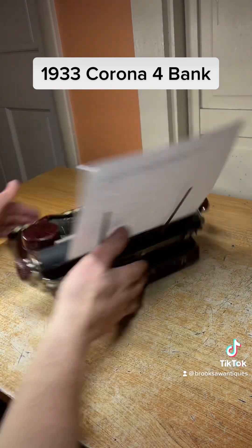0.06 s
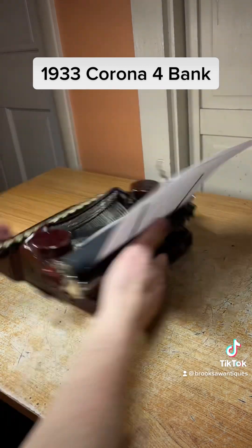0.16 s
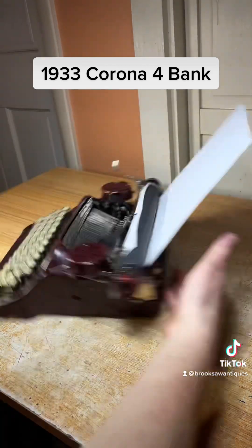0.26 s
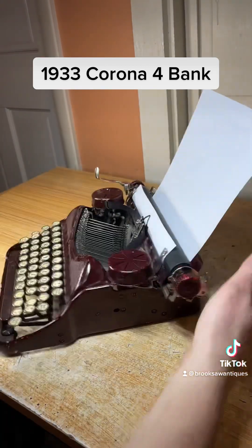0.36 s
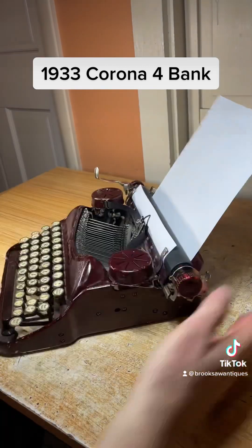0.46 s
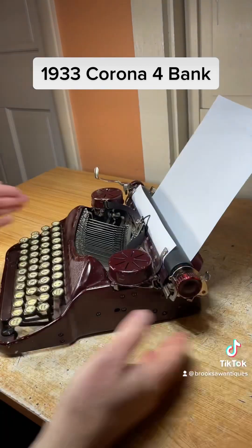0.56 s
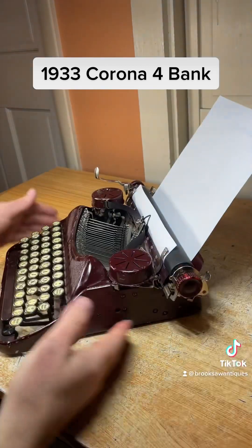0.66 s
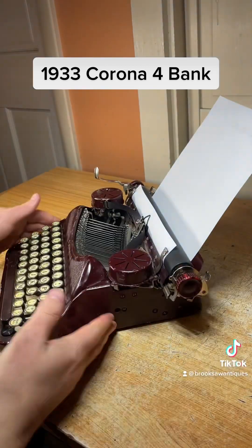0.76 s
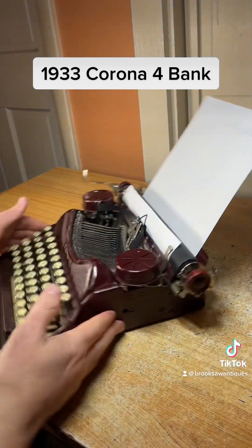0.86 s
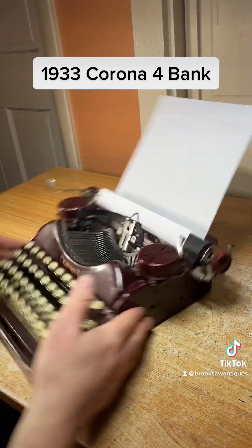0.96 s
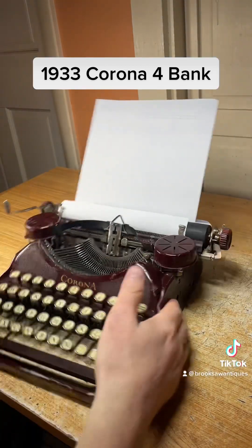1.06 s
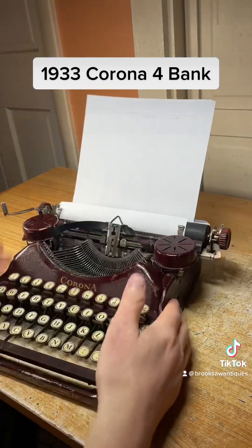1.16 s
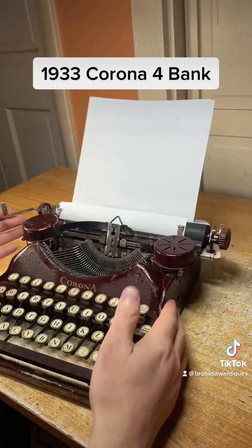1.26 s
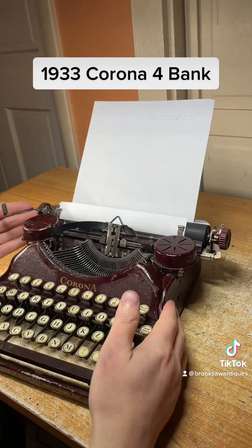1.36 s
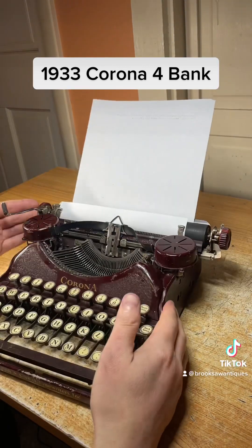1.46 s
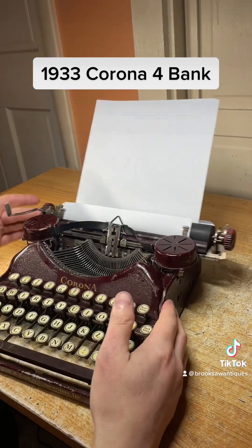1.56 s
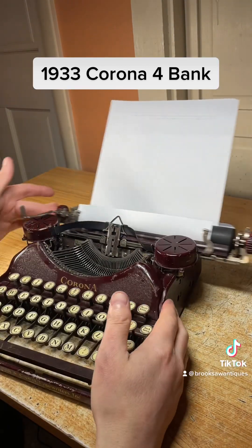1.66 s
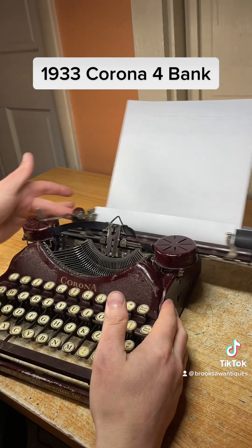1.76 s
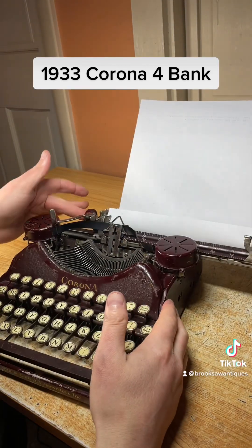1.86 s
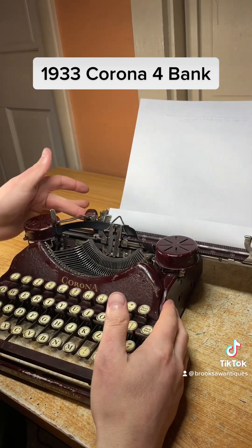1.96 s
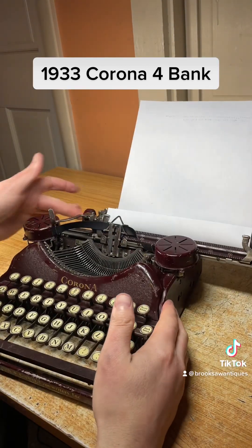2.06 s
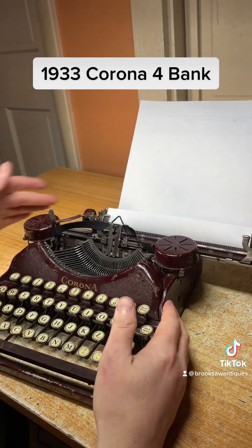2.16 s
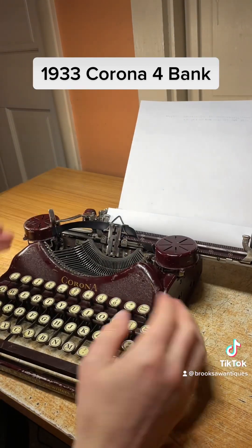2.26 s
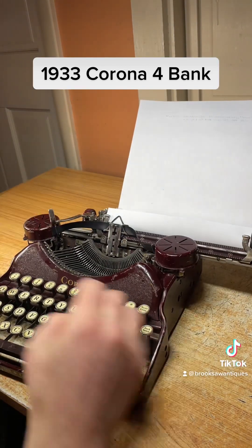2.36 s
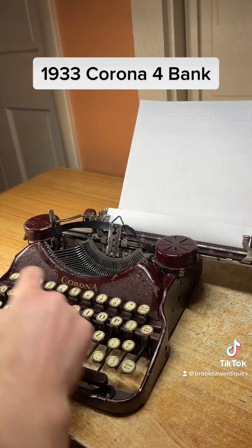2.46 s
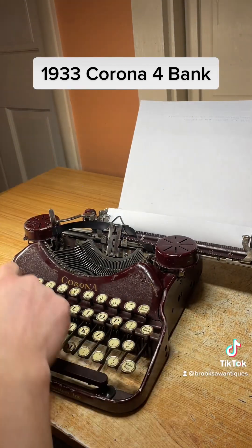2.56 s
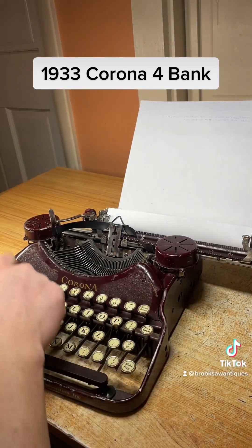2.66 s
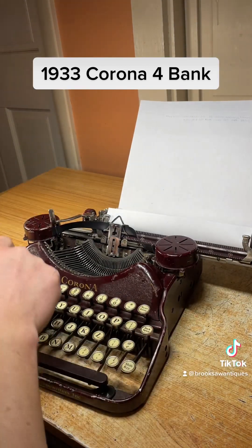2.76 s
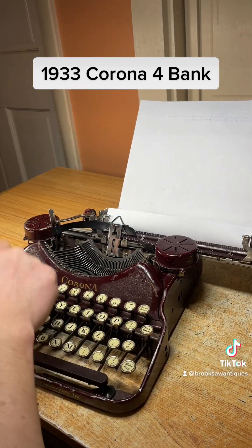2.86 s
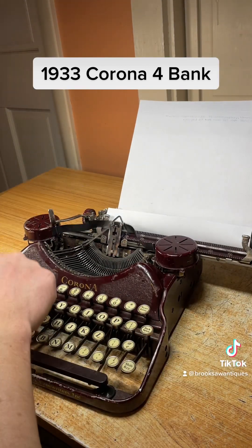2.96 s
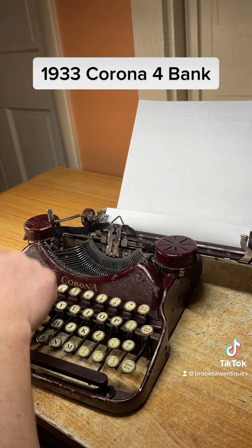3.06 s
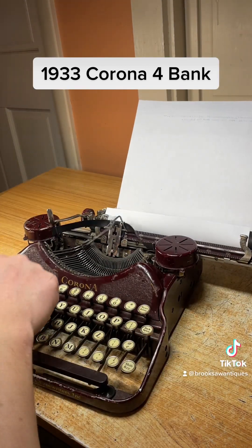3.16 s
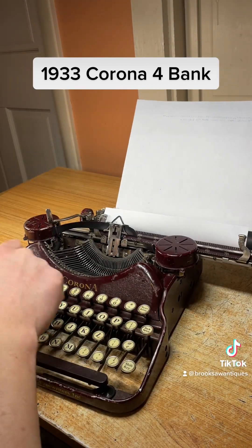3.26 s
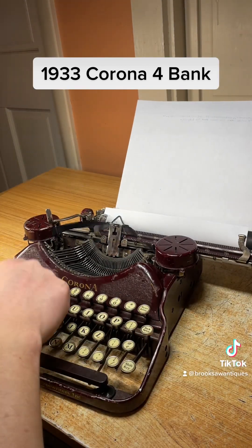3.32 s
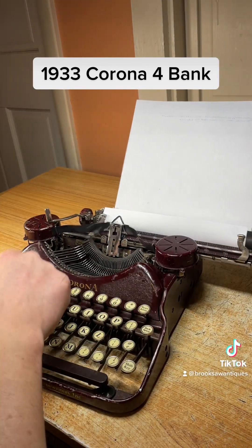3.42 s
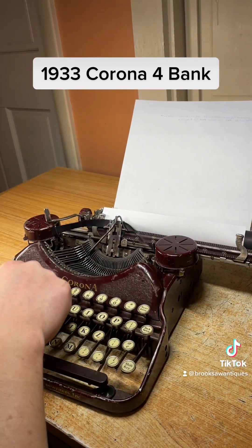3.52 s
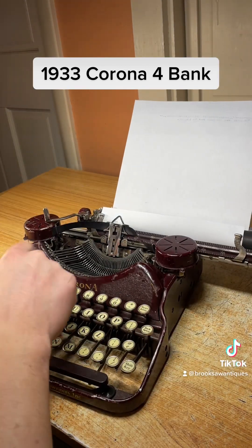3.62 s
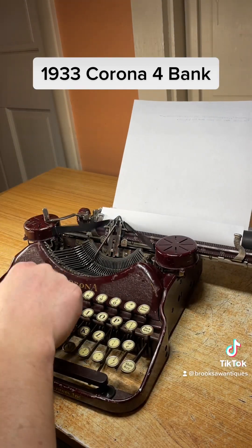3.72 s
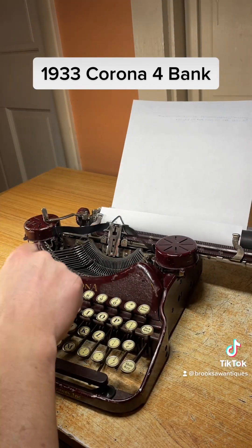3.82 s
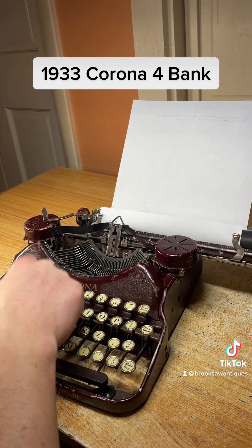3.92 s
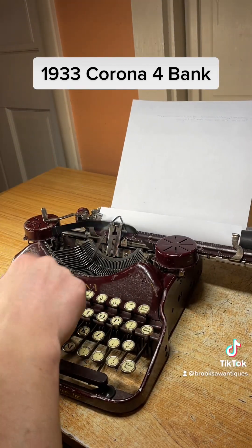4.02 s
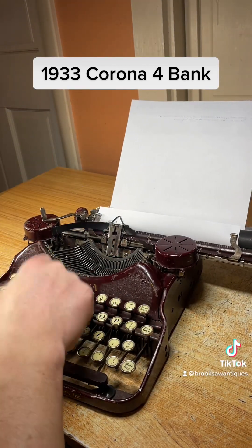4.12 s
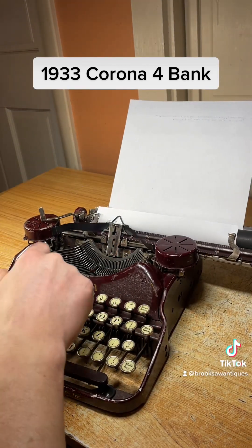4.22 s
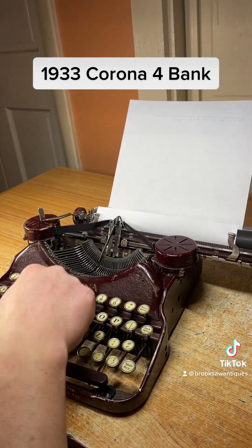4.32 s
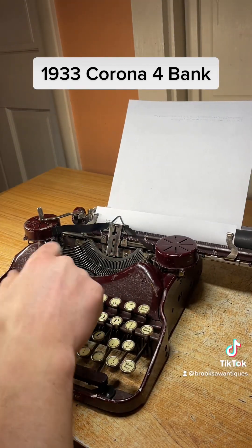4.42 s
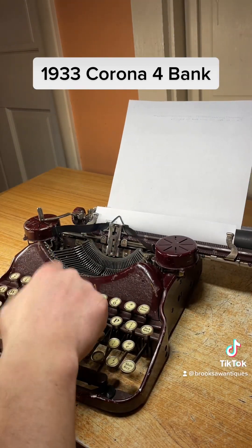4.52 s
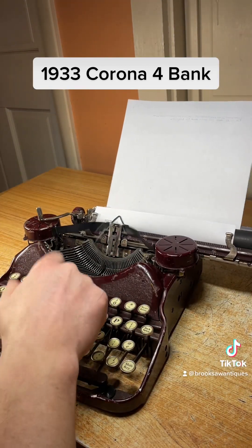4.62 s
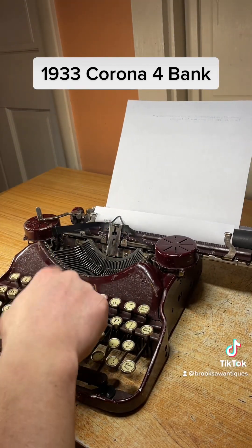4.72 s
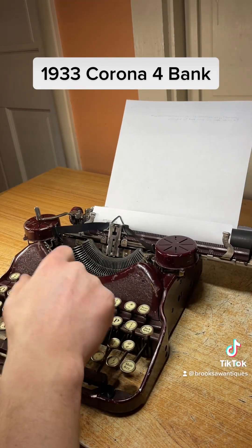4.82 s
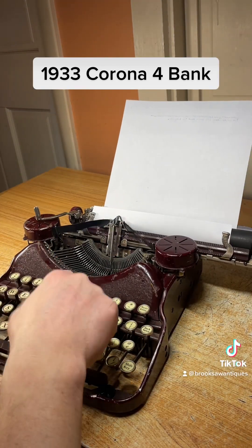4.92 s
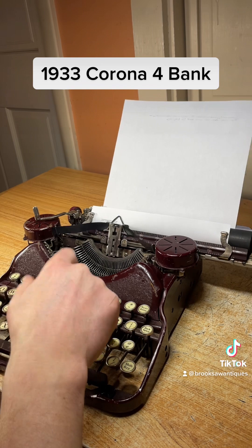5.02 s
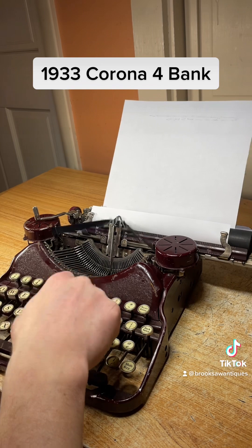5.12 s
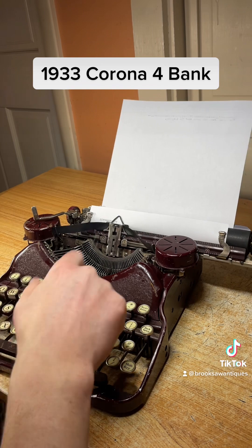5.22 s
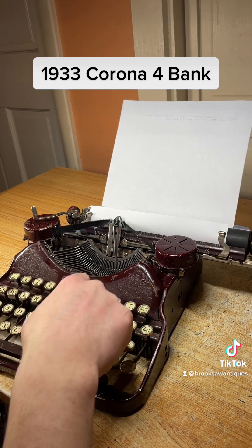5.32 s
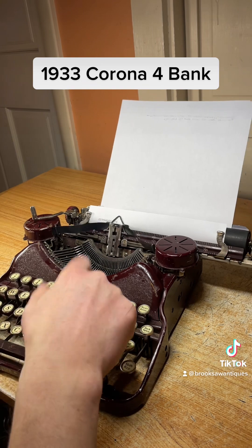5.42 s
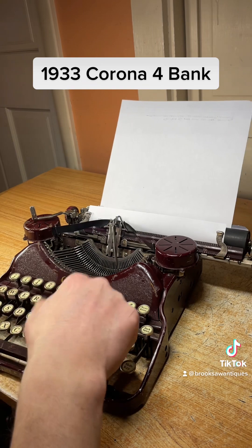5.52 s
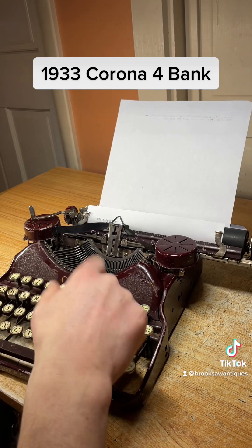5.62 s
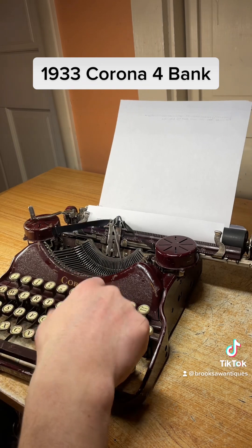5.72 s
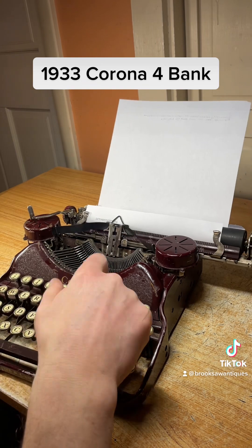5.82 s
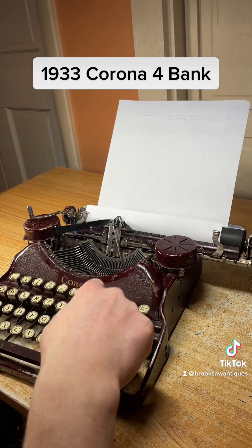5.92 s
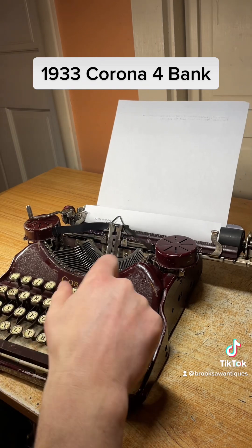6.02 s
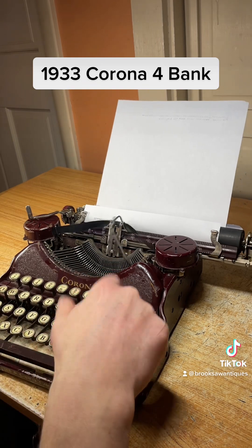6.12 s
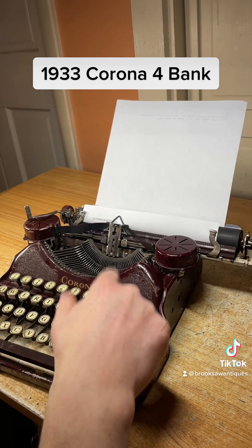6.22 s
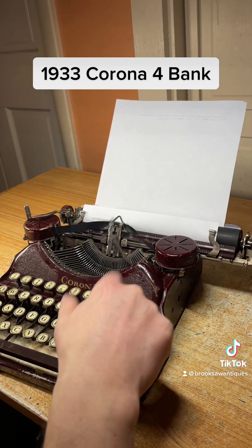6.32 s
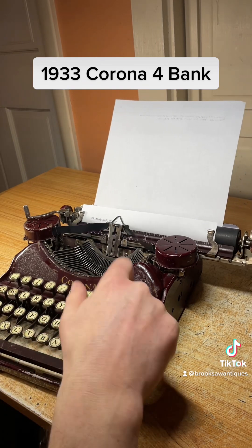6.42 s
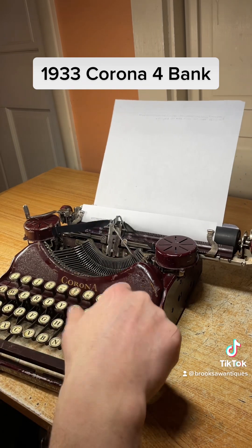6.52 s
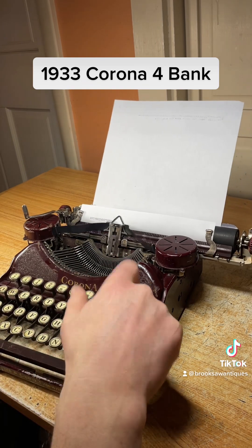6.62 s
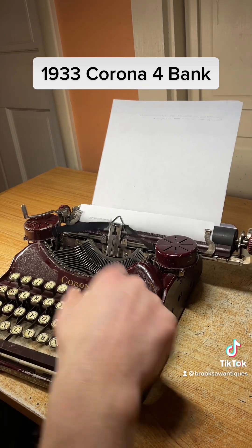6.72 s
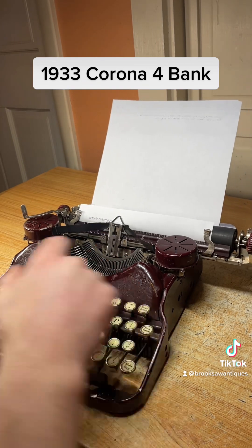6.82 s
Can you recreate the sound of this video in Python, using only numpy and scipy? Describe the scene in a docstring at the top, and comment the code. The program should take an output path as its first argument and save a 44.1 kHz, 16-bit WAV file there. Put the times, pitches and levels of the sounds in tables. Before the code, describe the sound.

Faint scrapes and knocks, a quick ratchet zip ending in a metallic clunk, then about twenty sharp, steady typebar strikes in a small room.

```python
"""One finger types an even run of keys on a portable typewriter that stands on a wooden table.
Before this the machine is turned on the table and its carriage is pushed over the rack to its stop.
Impacts are short noise bursts, coloured by what is struck; they set decaying modes of the steel frame going.
Pushes ring the low modes of the table top. A small room adds echoes and a decaying tail to the machine,
over steady low noise, and two close microphone ports hear it partly alike."""
import sys
import numpy as np
from scipy import signal
from scipy.fft import rfft, irfft
from scipy.io import wavfile

SR = 44100
rng = np.random.default_rng(int(sys.argv[2]) if len(sys.argv) > 2 else 0)


def output_pcm(signal):
    """Save a mono or channel-first signal as 16-bit PCM at the path in sys.argv[1].

    Samples are clipped to [-1, 1] before scaling.
    """
    pcm = np.clip(np.atleast_2d(signal).T, -1, 1) * 32767
    wavfile.write(sys.argv[1], SR, np.round(pcm).astype(np.int16))


N = 303408

# Keystrokes: (slug hits the platen [s], blow level [dB], rebound level [dB], key bottoms this long before [ms],
# key clatter level [dB], thump into the table [dB])
KEYSTROKES = [(2.8966, -8, -6, 8.5, -25, -30), (3.116, -11, -0.8, 10.7, -27.5, -28.5),
              (3.3188, -15, -1, 10, -26.5, -27), (3.524, -9.5, -3, 8.6, -26, -24),
              (3.7313, -8, -4, 9.8, -26.5, -25), (3.9348, -8, 0.5, 10, -29.5, -27),
              (4.1371, -3, -4.5, 11.3, -30, -23.5), (4.3307, -10, 1.5, 10.2, -36, -29),
              (4.5286, -6, -4.5, 10.4, -29.5, -30), (4.7221, -4, -3.5, 8.3, -27, -30),
              (4.9156, -5, -8.5, 9.2, -28, -26.5), (5.1104, -4, -9.5, 9.7, -31, -27.5),
              (5.3084, -3.5, -5, 9.6, -27.5, -28), (5.4977, -4.5, -9.5, 9.6, -28, -30),
              (5.695, -3.5, -5.5, 10.3, -27.5, -25), (5.894, -4, -5.5, 10, -26.5, -25.5),
              (6.0887, -8, 1, 8.1, -26, -23), (6.2857, -2.5, -4, 8.8, -25, -25),
              (6.4758, -9, -4, 9, -21, -27.5), (6.668, -7.5, -0.5, 8.8, -21, -21.5)]
# Keys let go: (typebar lands on its rest [s], thump into the table [dB])
KEY_RELEASES = [(3.013, -20), (3.2197, -20.5), (3.4234, -22), (3.6259, -24), (3.839, -23.5), (4.041, -24),
                (4.235, -22), (4.419, -24), (4.6269, -22), (4.819, -21.5), (5.016, -23.5), (5.2062, -23),
                (5.412, -21.5), (5.608, -23), (5.797, -23.5), (5.994, -20), (6.179, -28.5), (6.3706, -22),
                (6.5668, -19.5), (6.7593, -22)]
# Modes of the wooden table top: (frequency [Hz], relative level [dB], t60 before damping [s])
TABLE_MODES = [(52, -16, 0.34), (90.6, -8.5, 0.22), (117.2, 1, 0.17), (145.4, 0.5, 0.39),
               (190.7, -3.5, 0.094), (260, -15, 0.17), (313, -50, 0.06), (416, -15, 0.073),
               (613, -14.5, 0.13)]
# Spectrum of keys and loose parts: (frequency [Hz], relative level [dB])
KEY_COLOUR = [(200, 2.5), (600, 2.5), (2300, 4), (4500, 3.5), (8000, 2.5), (11500, -14), (15000, -5)]
# Spectrum of the steel body and the carriage rail: (frequency [Hz], relative level [dB])
BODY_COLOUR = [(300, -2.5), (1000, 4.5), (1600, 8), (2500, 9.5), (5000, 3), (8000, 2.5), (11500, -18),
               (15000, -1)]

UNEVEN_DB = 1.5  # standard deviation of the small clicks from one to the next


def amp(db):
    """Level in decibels to amplitude ratio: 20 dB is a factor of ten."""
    return 10 ** (np.asarray(db, float) / 20)


def read(points, hz):
    """Piecewise-linear interpolation of a spectrum on a log-frequency axis."""
    f, value = np.transpose(points)
    return np.interp(np.log(hz + 1), np.log(f + 1), value)


def add(mix, s, sound):
    """Linear superposition: mixes a sound in at time s, in place."""
    part = mix[max(round(s * SR), 0):][:len(sound)]
    part += sound[:len(part)]


def level(rows):
    """Envelope linear in decibels between rows (time [s], level [dB]), 120 dB down outside them."""
    s, db = np.transpose(rows)
    return amp(np.interp(np.arange(N) / SR, s, db, left=-120, right=-120))


def noise():
    """White noise of unit power: equal power at every frequency."""
    return rng.standard_normal(N)


def held_db(spread_db, hold):
    """Random modulation in dB: a normal draw held for a number of samples."""
    draws = rng.standard_normal(N // hold + 1)
    return spread_db * np.repeat(draws, hold)[:N]


def colour(x, points, size=2048):
    """Minimum-phase (causal) filter of a given spectrum, scaled to keep the power of white noise."""
    hz = abs(np.fft.fftfreq(size, 1 / SR))
    log_gain = np.log(amp(read(points, hz)))
    # the Hilbert transform of the log gain gives the minimum phase
    response = np.exp(np.conj(signal.hilbert(log_gain)))
    taps = np.fft.ifft(response).real[:size // 2]
    return signal.oaconvolve(x, taps / np.linalg.norm(taps))[:N]


def ring(x, modes, damping=1):
    """Modal synthesis: the excitation x sets exponentially decaying sines going; damping scales t60."""
    t = np.arange(SR // 2) / SR
    response = sum(amp(db - 60 * t / (t60 * damping)) * np.sin(2 * np.pi * hz * t)
                   for hz, db, t60 in modes)
    return signal.oaconvolve(x, response)


def bursts(s, db, rise_ms, t60_ms):
    """Impact noise: linear rise up to each time s, exponential decay after; the envelope fixes the energy."""
    out = np.zeros(N)
    rows = np.broadcast(s, amp(db), np.maximum(rise_ms, .05), np.maximum(t60_ms, .5))
    for at, gain, rise, t60 in rows:
        ms = np.arange(-rise, t60, 1000 / SR)
        shape = np.where(ms < 0, 1 + ms / rise, amp(-60 * ms / t60))
        noisy = shape * rng.standard_normal(len(ms))
        same_energy = np.linalg.norm(shape) / np.linalg.norm(noisy)
        add(out, at - rise / 1000, gain * noisy * same_energy)
    return out


def hush():
    """Stationary filtered noise: the steady low noise of the room."""
    # Spectrum of the room noise: (frequency [Hz], relative level [dB])
    hush_colour = [(30, 5.5), (50, -6), (140, -5), (220, -3), (600, -4.5), (1000, -9), (1300, -11.5),
                   (1600, -13.5), (2000, -17), (4200, -30), (6500, -36.5), (11000, -39), (12500, -66)]
    return amp(-60) * colour(noise(), hush_colour, size=8192)


def room(x):
    """Reverberation as convolution: direct sound, single echoes, and sparse taps with t60 set by frequency."""
    # Single echoes: (delay [ms], level against the direct sound [dB])
    echoes = [(2.5, -63.5), (7.0, -17), (9.5, -24.5), (12.5, -29.5), (23.0, -23.5), (28.0, -25)]
    # Reverberation time: (frequency [Hz], t60 [s])
    room_t60 = [(200, 1), (1000, 0.28), (4500, 0.33), (8000, 0.21), (13000, 0.14)]
    taps = np.zeros(SR // 2)
    at = np.arange(200, len(taps) - 20, 20)
    taps[at + rng.integers(0, 20, len(at))] = rng.choice([-1., 1.], len(at))
    hz, t, bands = signal.stft(taps, SR, nperseg=128)
    decay = amp(-60 * t / read(room_t60, hz)[:, None])
    response = signal.istft(bands * decay, SR, nperseg=128)[1]
    response *= amp(-15.5) / np.linalg.norm(response)
    response[0] = 1  # direct sound
    for ms, db in echoes:
        response[round(ms * SR / 1000)] += amp(db)
    return signal.oaconvolve(x, response)[:N]


def ports(a, b, likeness):
    """Coherence of two receivers: left hears a; right hears a shifted in phase, blended with unrelated b."""
    # Phase by which the left port leads: (frequency [Hz], lead [rad])
    phase_lead = [(300, 0), (690, -.4), (2000, .1), (3200, .8), (4900, .4), (6370, 1.4), (7700, 2.25),
                  (9400, 2.95), (14500, 3.2), (15400, 3.5)]
    hz = np.fft.rfftfreq(N, 1 / SR)
    same = np.clip(read(likeness, hz), 0, 1)
    turn = np.exp(.5j * read(phase_lead, hz))  # half the lead on each port
    a, b = rfft(a), rfft(b)
    right = same * a + np.sqrt(1 - same ** 2) * b  # keeps the power
    return irfft(np.array([a * turn, right / turn]), N)


def teeth():
    """Ratchet kinematics: when each rack tooth passes the pawl, and the dB lost while the carriage is slow."""
    # Carriage travel along the rack: (time [s], teeth passed [count])
    travel = [(1.4713, 0), (1.5355, 2), (1.5685, 4), (1.6072, 7), (1.653, 11), (1.6928, 15), (1.7955, 28),
              (1.8444, 34)]
    full_speed, db_per_doubling = 67, 10  # teeth/s; slower than this the pawl drops more softly
    s, passed = np.transpose(travel)
    at = np.interp(np.arange(passed[-1] + 1), passed, s)
    speed = 1 / np.gradient(at)
    return at, db_per_doubling * np.log2(np.minimum(speed / full_speed, 1))


def pushes():
    """Impulses into the table, each as (time [s], level [dB], rise [ms], t60 factor, extra low level [dB])."""
    # Pushes in handling: (time [s], level [dB], factor on t60 [ratio], extra level of the lowest modes [dB])
    thuds = [(0.244, -52, 0.59, 14), (0.315, -40, .42, -4), (0.424, -58, .65, -3), (1.13, -44, 0.92, -3),
             (1.869, -14, 0.72, -11), (2.023, -28.5, 0.54, 7.5), (2.236, -50, 0.97, -5),
             (2.4, -46.5, 0.54, 5.5), (2.486, -48.5, 0.33, 12), (2.871, -44, 0.57, 13)]
    # Push of a blow: (delay after the slug hits [ms], rise time constant [ms], factor on t60 [ratio],
    # extra level of the lowest modes [dB])
    blow_push = (2.5, 1.5, 0.88, -5)
    # Push of a returning typebar: (delay after it lands [ms], rise time constant [ms],
    # extra level of the lowest modes [dB])
    return_push = (12.44, 5.1, 1.9)
    # The ring shortens as the hand moves along the row:
    # (factor on t60 at the first key [ratio], at the last key [ratio])
    return_damping = (0.7, 0.24)
    rows = [(s, db, 2.9, damping, low_db) for s, db, damping, low_db in thuds]
    rows += [(s + blow_push[0] / 1000, db, *blow_push[1:]) for s, *_, db in KEYSTROKES]
    delay_ms, rise_ms, low_db = return_push
    dampings = np.linspace(*return_damping, len(KEY_RELEASES))
    rows += [(s + delay_ms / 1000, db, rise_ms, damping, low_db)
             for (s, db), damping in zip(KEY_RELEASES, dampings)]
    return rows


def table_shaking():
    """Random vibration: low noise while things move on the table, and modes driven by feet and rack."""
    # Shudder of the table top: (time [s], level [dB])
    shudder = [(0.0, -55), (0.84, -58), (1.21, -52.5), (1.44, -46.5), (1.65, -81), (1.84, -40.5),
               (2.05, -39.5), (2.22, -58.5), (2.9, -60.5), (3.05, -47.5), (5, -44), (6.78, -42.5),
               (6.88, -48)]
    # Spectrum of the shudder: (frequency [Hz], relative level [dB])
    shake_colour = [(30, -6.5), (55, 1), (100, 3), (150, 1.5), (220, -7.5), (400, -19), (1000, -60)]
    # Noise drive from the juddering feet: (time [s], level [dB])
    foot_judder = [(0.69, -71.5), (0.786, -68.5), (0.82, -100)]
    shaking = colour(level(shudder) * noise(), shake_colour, size=8192)
    at, speed_db = teeth()
    rack_rumble = level(np.transpose([at, -67 + speed_db]))
    drive = (level(foot_judder) + rack_rumble) * noise()
    return shaking + ring(drive, TABLE_MODES, damping=.3)[:N]


def table_thumps():
    """Modal response of a plate: each soft push acts at its own spot and so reweights the low modes."""
    out = np.zeros(N)
    rows = pushes()
    spots = rng.standard_normal((len(rows), len(TABLE_MODES), 2))
    for (at, db, rise_ms, damping, low_db), spot in zip(rows, spots):
        modes = []
        for (hz, mode_db, t60), (detune, weight) in zip(TABLE_MODES, spot):
            spread = 3 * weight * (mode_db < -4)  # only the weaker modes vary in level
            modes.append((hz * (1 + .015 * detune), mode_db + spread + low_db * (hz < 130), t60))
        sound = ring([amp(db)], modes, max(damping, .05))
        ms = np.arange(len(sound)) / SR * 1000
        onset = (1 - np.exp(-ms / max(rise_ms, .5))) ** 2
        add(out, at, sound * onset)
    return out


def drag():
    """Friction noise: the feet scrape grittily on the wood; each drag swells, holds and fades."""
    # Drags: (start [s], full [s], letting go [s], end [s], level before grit at start [dB], at full [dB])
    drags = [(0.001, .11, 0.25, 0.48, -57.5, -48), (0.686, 0.955, 0.99, 1.38, -67.5, -52)]
    # Spectrum of the scrape: (frequency [Hz], relative level [dB])
    scrape_colour = [(200, -3), (600, -2.5), (1600, -1.5), (3200, -8), (6500, -12.5), (10000, -15),
                     (15000, -33)]
    fade_db = -23.5  # below full, at the end of a drag
    grit = amp(held_db(1.5, 64) + held_db(1.4, 512))
    weight = sum(level([(start, start_db), (full, db), (letting_go, db), (end, db + fade_db)])
                 for start, full, letting_go, end, start_db, db in drags)
    return colour(weight * grit * noise(), scrape_colour)


def knocks():
    """Impact excitation: handling knocks, each divided between the steel body and the wood."""
    # Knocks of body and carriage: (time [s], level before the division [dB], t60 [ms], share of wood [0-1])
    knock_rows = [(0.072, -35, 48, 0.54), (0.131, -40.5, 76, 0.9), (0.436, -56, 30, 0.9),
                  (0.464, -49.5, 21, 0.77), (0.585, -53.5, 94, 0.7), (0.728, -47.5, 30, 0.34),
                  (0.763, -39, 16, 0.72), (1.027, -39.5, 33, 0.37), (1.125, -44.5, 34, 1),
                  (1.375, -42, 65, 1), (1.444, -48, 55, 0.93), (1.461, -44, 35, 0.6),
                  (1.852, -18.5, 32, 0.08), (1.869, -22.5, 14, 0.6), (2.005, -30, 51, 0.24),
                  (2.452, -59, 47, 0.56), (2.7, -64, 42, 0.36)]
    # Spectrum of the wood: (frequency [Hz], relative level [dB])
    wood_colour = [(150, -8), (350, 0), (800, -3), (1500, -12), (3000, -24), (6000, -34), (15000, -45)]
    rise_ms = .85
    s, db, t60_ms, wood = np.transpose(knock_rows)
    wood_db, steel_db = (20 * np.log10(np.clip(share, 1 / 1000, 1)) for share in (wood, 1 - wood))
    steel_part = colour(bursts(s, db + steel_db, rise_ms, t60_ms), BODY_COLOUR)
    wood_part = colour(bursts(s, db + wood_db, rise_ms, t60_ms), wood_colour)
    return steel_part + wood_part


def carriage():
    """Ratchet and sliding friction: the pawl clicks over the rack, the rail hisses, loose parts settle."""
    # Spectrum of the rack clicks: (frequency [Hz], relative level [dB])
    rack_colour = [(600, -4.5), (1300, -30), (2400, -1.5), (4200, -4.5), (6500, -4), (8200, -0.5),
                   (10000, -4.5), (15000, -11.5)]
    # Modes of the pawl on the rack: (frequency [Hz], relative level [dB], t60 [s])
    pawl_modes = [(2430, -6, 0.026), (3630, -17.5, 0.02), (5030, -3.5, 0.014), (8870, -1.5, 0.045)]
    # Carriage sliding on its rail: (time [s], level [dB])
    rail_slide = [(1.46, -59), (1.48, -47.5), (1.522, -65), (1.532, -50.5), (1.582, -45.5), (1.84, -37),
                  (1.856, -22.5), (1.86, -46)]
    # Loose parts after the carriage meets its stop and rebounds: (time [s], level [dB], rise [ms], t60 [ms])
    settling_rows = [(1.862, -31, 10, 184), (2.003, -43, 11, 340)]
    at, speed_db = teeth()
    click_db = -27.5 + speed_db + UNEVEN_DB * rng.standard_normal(len(at))
    rack = colour(bursts(at, click_db, 0.8, 15), rack_colour)
    pawl = amp(-26.5) * ring(rack, pawl_modes)[:N]
    slide = colour(level(rail_slide) * noise(), BODY_COLOUR)
    settling = colour(bursts(*np.transpose(settling_rows)), KEY_COLOUR)
    return rack + pawl + slide + settling


def frame(blows, s):
    """Modal response of the steel frame: every typebar loads it its own way, shifting and reweighting modes."""
    # Modes of the frame: (mean frequency [Hz], mean relative level [dB], t60 [s])
    frame_modes = [(587, -9, .11), (1450, -14, .04), (2400, -8, .03), (2950, -10, .04), (3760, -9, .03),
                   (4130, -8, .035), (4685, -5, .03), (5300, -8, .03), (6080, -9, .025), (6810, -8, .03),
                   (8700, -9, .02)]
    out = np.zeros(N)
    bars = rng.standard_normal((len(s), len(frame_modes), 2))
    for at, end, bar in zip(s, np.append(s[1:], N / SR), bars):
        modes = [(hz * (1 + .011 * detune), db + 2.2 * weight, t60)
                 for (hz, db, t60), (detune, weight) in zip(frame_modes, bar)]
        add(out, at, ring(blows[round(at * SR):round(end * SR)], modes))
    return out


def typing():
    """Impact chain of a keystroke: finger lands, key bottoms, slug hits and rebounds, bar falls, carriage steps."""
    # Escapement stepping the carriage one space: (time [s], level before chatter [dB])
    escapement = [(3.044, -34), (3.253, -31.5), (3.455, -37.5), (3.6597, -36.5), (3.8662, -30.5),
                  (4.069, -30), (4.2634, -27.5), (4.45, -28), (4.656, -28.5), (4.849, -29), (5.0453, -30.5),
                  (5.239, -30.5), (5.4515, -31.5), (5.6491, -32), (5.8304, -32.5), (6.0266, -30),
                  (6.2148, -28), (6.408, -29), (6.616, -30.5), (6.8087, -31)]
    # Spectra of slug, clatter, bar on its rest, and escapement: (frequency [Hz], relative level [dB])
    slug_colour = [(300, -23.5), (1000, -19.5), (1600, -14), (2300, -6), (4200, -7), (5000, -1.5),
                   (8000, -1), (10000, -4.5), (11500, -16), (13000, -8), (15000, -65)]
    clatter_colour = [(300, -11), (1000, -8), (2300, -8.5), (3200, -3.5), (4600, 7), (6500, -4),
                      (10000, -5), (11500, -22), (13000, -49), (15000, -23)]
    rest_colour = [(300, -11), (1000, -3), (2300, 0.5), (4200, -2.5), (8000, -4), (11500, -13),
                   (15000, -16.5)]
    pawl_colour = [(400, -1.5), (2300, -6), (4200, 0), (6500, -2), (8000, 1.5), (11500, -9), (15000, -14)]
    touch_ms, rebound_ms = 33, 2.9  # finger lands before the slug hits; slug rebounds after it
    s, db, rebound_db, lead_ms, key_db, _ = np.transpose(KEYSTROKES)
    fall, _ = np.transpose(KEY_RELEASES)
    step, step_db = np.transpose(escapement)
    touch, bottom = s - touch_ms / 1000, s - lead_ms / 1000
    touch_db, fall_db = UNEVEN_DB * rng.standard_normal((len(s), 2)).T
    loose = amp(held_db(1.68, 32))  # loose parts chatter unevenly

    slugs = bursts(s, db, .2, 9) + bursts(s + rebound_ms / 1000, rebound_db, .1, 3.5)
    clatter = bursts(s + 0.0072, db - 17.0, 3.74, 56) + bursts(s + 0.0057, db - 30, 3.15, 190)
    keys = bursts(bottom, key_db, 1.0, 85)
    # the lever slides back, then the bar lands
    falls = bursts(fall, -37.5 + fall_db, 7.9, 143) + bursts(fall, -36.5 + fall_db, 0.86, 22)
    steps = bursts(step, step_db, 0.88, 49)
    # the finger lands and takes up the slack in the key lever
    touches = bursts(touch, -41.5 + touch_db, 3.7, 124.0) + bursts(touch, -38 + touch_db, 0.8, 18)
    # levers and springs, from the first touch to the last step
    rustle = level([(touch[0], -57), (step[-1], -57)]) * noise()

    blows = colour(slugs, slug_colour) + colour(loose * clatter, clatter_colour)
    blows += colour(keys + loose * (touches + rustle), KEY_COLOUR)
    blows += colour(loose * falls, rest_colour) + colour(loose * steps, pawl_colour)
    return blows + amp(-38.5) * frame(blows, bottom - .002)


def machine():
    """Superposition of everything that clicks and scrapes, reverberated by the room."""
    return room(typing() + knocks() + carriage() + drag())


def scene():
    """Superposition of partly coherent machine and room noise with a table alike in both ports."""
    # Likeness of the ports for the machine: (frequency [Hz], coherence [0-1])
    machine_likeness = [(250, .99), (800, .88), (1800, .93), (3000, .62), (5000, .85), (8000, .9),
                        (10500, .99), (13500, .995), (15000, .75)]
    # Likeness of the ports for the room noise: (frequency [Hz], coherence [0-1])
    hush_likeness = [(100, .998), (300, .85), (700, .3), (2500, .6), (8000, .8), (10000, .99)]
    table = table_shaking() + table_thumps()
    return ports(machine(), machine(), machine_likeness) + table + ports(hush(), hush(), hush_likeness)


def record(dry):
    """Band-limited transducer with saturation: bass cut, soft overload near full scale, treble roll-off."""
    bass_cut_hz, stop_hz, edge_hz = 38.5, 16500, 17146  # stop_hz: 40 dB down from here up
    bass_cut = signal.butter(4, bass_cut_hz, "high", fs=SR, output="sos")
    roll_off = signal.cheby2(12, 40, stop_hz, fs=SR, output="sos")
    band_limit = signal.firwin(511, edge_hz, window=("kaiser", 9), fs=SR)
    heard = signal.sosfilt(bass_cut, dry)
    heard = .9 * np.tanh(heard / .9)
    heard = signal.sosfilt(roll_off, heard)
    return signal.oaconvolve(heard, band_limit[None], "same")


dry = scene()
out = record(dry)
output_pcm(out)
```